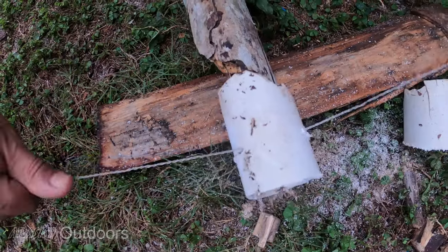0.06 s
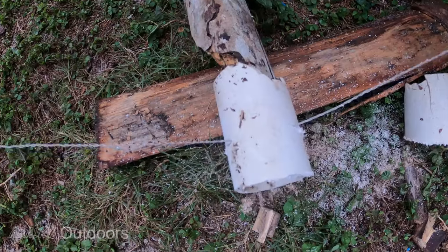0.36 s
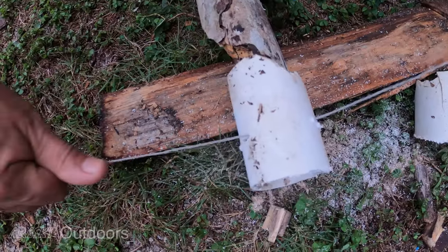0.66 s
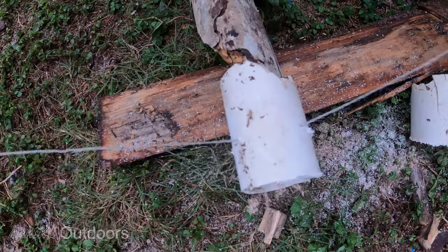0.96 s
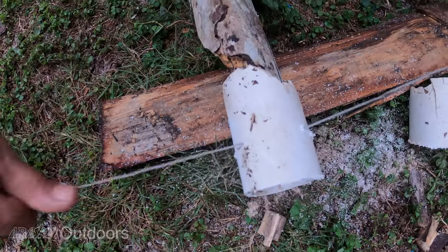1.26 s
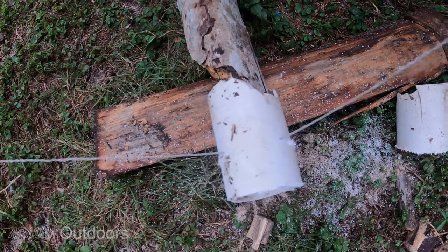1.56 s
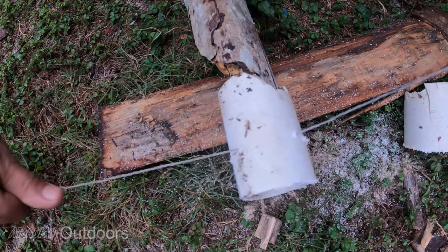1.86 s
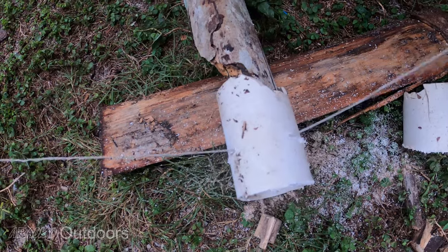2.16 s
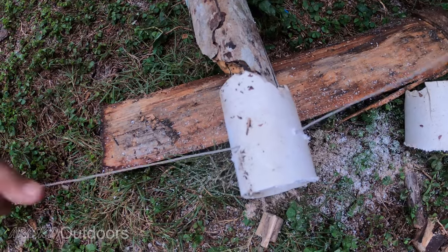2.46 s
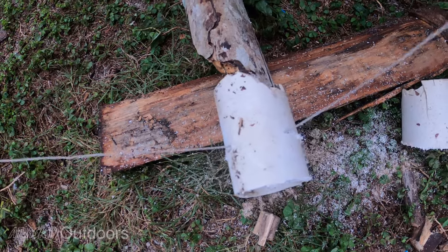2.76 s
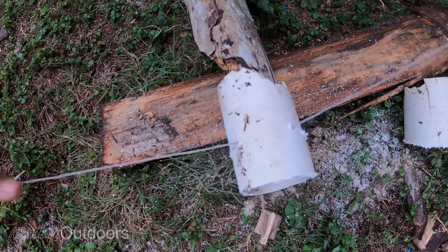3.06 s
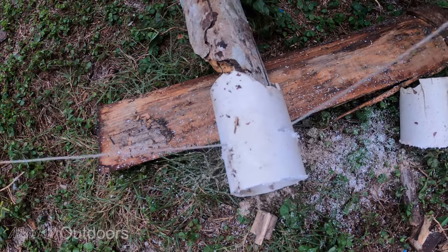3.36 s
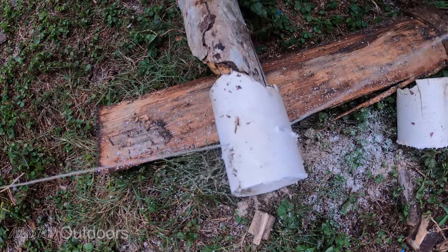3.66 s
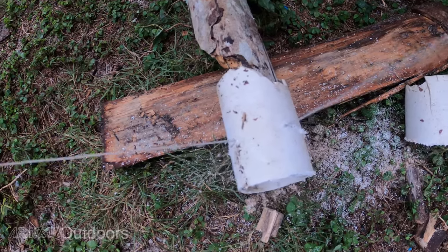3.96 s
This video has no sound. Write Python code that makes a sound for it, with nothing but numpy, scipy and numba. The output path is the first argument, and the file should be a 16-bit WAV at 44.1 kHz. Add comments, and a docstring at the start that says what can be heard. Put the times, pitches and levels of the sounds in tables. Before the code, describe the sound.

A wire saw rasps back and forth through a log in quick, even strokes.

```python
"""Wire saw through a sleeved log

A wire saw is pulled to and fro through a log sleeved in plastic pipe, outdoors and close up.
The twisted wire tears fibres in dense, chattering clicks that ring log and pipe; now and then it snags.
Its twists zip over the edge of the cut, and it thrums higher as it tightens and squeaks when slack.
The log rumbles and knocks on its plank. Under it all lies a low bed of air with one deep swell."""
import sys
import numpy as np
from scipy import signal
from scipy.fft import rfft, irfft
from scipy.io import wavfile
from numba import njit

SR = 44100
rng = np.random.default_rng(int(sys.argv[2]) if len(sys.argv) > 2 else 0)


def put_to_file(sound):
    """Save the sound as 16-bit audio at rate SR, in the file named by the first command-line argument."""
    columns = np.atleast_2d(sound).T  # one column per channel
    safe = np.clip(columns, -1, 1)
    whole_steps = np.round(safe * 32767)
    wavfile.write(sys.argv[1], SR, whole_steps.astype(np.int16))


N = 176400
TAPS = 4096  # length of the ring of log and pipe, in samples

# pulls of the saw, left and right in turn, each with its own trims (start [s], speeding up [s],
# slowing down [s], rasp [dB], treble [dB], pipe ring [dB], zip [dB], wire hum [dB])
STROKES = [(-.08, 0.13, .11, 1, 2.1, 1.5, -4, 4.5), (.283, 0.15, 0.19, 1.85, 2, 0, -1, -2),
           (0.599, .14, 0.089, .4, 2, 1, -5, -3.5), (0.918, 0.1, .13, 0.56, 0, 1, 6, 0),
           (1.23, 0.14, 0.11, 1.2, 1, 1.5, 2, -4), (1.53, 0.13, 0.12, 1.6, -0.5, 1, 3.5, 0.5),
           (1.83, 0.13, 0.12, 0.5, 1, -8, -5, -5), (2.13, 0.12, 0.15, 1.6, 0.5, -1, -3, 0),
           (2.438, 0.13, 0.11, -0.5, 1, -3, 2.5, 0), (2.764, 0.13, 0.14, 0.66, 1, -4, -0.5, 2),
           (3.069, 0.146, 0.11, 1.2, 0.5, -1.5, -0.5, 3.5), (3.373, 0.16, 0.15, 0.85, 1, -10, 0, 2),
           (3.696, 0.12, 0.1, 0, 1.9, 1, -2, 3.5)]
# the wire catches and breaks free (time [s], strength [dB])
SNAGS = [(0.327, -8.5), (0.438, -5), (1.028, -6), (1.072, 5), (1.3317, 0), (1.3907, -2), (1.509, -11),
         (1.631, -13), (1.678, 4), (1.878, -13), (2.206, -3), (2.524, -6), (2.72, -4), (3.15, -7),
         (3.2, -1), (3.314, 1.5), (3.347, -12), (3.454, 1), (3.967, -14)]
# broad tone colour of the cut (frequency [Hz], level [dB])
WOOD_COLOUR = [(60, -23.5), (200, -19.5), (400, -8.5), (520, -11), (820, -12.5), (1050, -5), (1330, -3.5),
               (1480, -9), (1700, -1), (2200, -1), (2800, -7), (4000, -4.5), (4400, -8), (4750, -1.5),
               (5200, 0.5), (5800, -10.5), (6400, -18), (8200, -17), (10200, -21.5), (11100, -27),
               (12300, -25), (13000, -31), (14000, -32), (15500, -69)]
# resonances of log and pipe
# (frequency [Hz], width [Hz], level pulling left [dB], pulling right [dB], change with time [dB/s])
BODY_MODES = [(410, 60, -14.5, -12, 3.5), (658, 84, 2, 0.5, 1.15), (717, 39, 4, -5.5, 1),
              (926, 82, 0.5, 0, -0.5), (1055, 67, 6.5, 2.5, 0), (1187, 96, 4.5, 2.5, -1),
              (1386, 136, 2, 3.5, -3.5), (1623, 140, -8, -8.5, 3.5), (1925, 116, 10, 7, 0),
              (2454, 76, -30, 5.5, -4), (3380, 130, 3, -23, -11.5), (6860, 460, -10.5, -29, -1.5),
              (10100, 1600, -23, -26, 2.5)]
# a thin overtone of the pipe, rising as the cut deepens (time [s], frequency [Hz])
PIPE_OVERTONE = [(0, 6440), (.8, 6660), (1.1, 7360), (1.7, 7550), (2.4, 8050), (2.9, 9610), (4, 10500)]
# squeaks of the slack wire (time [s], pitch [Hz], level [dB])
SQUEAKS = [(.487, 5160, -24), (.97, 4570, -43), (1.825, 4200, -45), (2.425, 4230, -45)]
# the log rocks on the plank (time [s], pitch [Hz], level [dB])
KNOCKS = [(0.134, 157, -28), (0.424, 154, -22), (1.149, 297, -21.5), (2.658, 410, -25), (2.70, 355, -22),
          (3.316, 332, -22.5), (3.949, 370, -25)]
# fader curve of the log's rumble (time [s], level [dB])
LOG_LEVEL = [(0, -34), (.6, -37), (1.1, -37), (1.75, -32), (2, -40.5), (2.4, -31), (2.85, -35.5),
             (3.1, -26), (3.4, -35.5), (4, -42.5)]
# tone colour of the outdoor air (frequency [Hz], level [dB])
AIR_COLOUR = [(20, -11), (35, -1), (55, -5.5), (80, -2.5), (150, -3), (300, -9.5), (600, -20), (2000, -22),
              (6000, -31), (15000, -78.5)]
# sound scattered by the ground (frequency [Hz], level against the direct sound [dB])
GROUND_SCATTER = [(100, -24), (1000, -9.5), (2000, -13), (3300, -1), (4300, -1), (5000, -7), (6000, -12.5),
                  (6800, -10), (9800, -5), (14000, -10)]
# stereo balance (frequency [Hz], left minus right [dB])
STEREO_BALANCE = [(100, 1.9), (600, 1), (1200, -1), (2000, 0.2), (4000, 1), (5500, 3), (6500, -1),
                  (8300, -6), (9300, -7.5), (10200, -23), (11000, -9), (14000, -6)]
# stereo phase (frequency [Hz], lead of the left side [rad])
STEREO_PHASE = [(20, 0), (500, 0.35), (1000, 0.13), (2000, -0.95), (4000, -0.5), (5100, -2), (5800, -5.5),
                (6300, -2 * np.pi)]


def saw(t, speed, since_turn, stroke, chatter, rings):
    """One layer of sawing: the rasp through log and pipe, the wire's zip and hum, the log's rumble."""
    pressure, bite, pipe_gain, zip_gain, hum_gain = undb(np.array(STROKES).T[3:])[:, stroke]
    stuck_db = -4.5 * (since_turn < .016)  # the wire sticks for a moment after each turn
    force = undb(-19 + stuck_db) * pressure * (.05 + speed ** 1.85) * chatter
    rasp = log_and_pipe(t, tearing(speed, force, bite) + snags(t), stroke, rings, pipe_gain)
    wire = zip_gain * wire_zip(speed, chatter) + hum_gain * wire_hum(speed)
    return rasp + wire + log_rumble(t, speed)


def arm_motion(t, last_turn_s=4.01):
    """Each pull speeds up and slows to the turn: gives speed (0 to 1), time since the turn, stroke."""
    start, rise, fall = np.array(STROKES).T[:3]
    end = np.append(start[1:], last_turn_s)
    stroke = np.maximum(np.searchsorted(start, t, side="right") - 1, 0)
    since_turn = t - start[stroke]
    ease = lambda u: np.sin(np.pi / 2 * np.clip(u, 0, 1))
    speed = ease(since_turn / rise[stroke]) * ease((end[stroke] - t) / fall[stroke])
    return speed, since_turn, stroke


def tearing(speed, force, bite, treble_hz=2780):
    """Clicks of torn fibres, denser and brighter with speed."""
    chance = np.clip(7500 * (speed + .15) / SR, 0, 1)
    size = undb(3 * np.minimum(noise(), 2)) * np.sign(noise())
    clicks = unit((rng.random(N) < chance) * size / np.sqrt(chance)) * force
    hz = np.arange(N // 2 + 1) * SR / N
    dull = irfft(rfft(clicks) / (1 + (hz / treble_hz) ** 4), N)
    return dull + (clicks - dull) * bite * (.68 + .32 * speed ** .42)


def snags(t, decay_s=.0018):
    """The wire catches and breaks free in sharp bursts of noise."""
    bursts = sum(undb(db - 9.5) * (t >= s) * np.exp(-np.abs(t - s) / decay_s) for s, db in SNAGS)
    return bursts * noise()


def body_rings(ripple_hz=130.2, ripple_db=1.97):
    """One impulse response a stroke: the ring follows the direction of pull and the depth of the cut."""
    f, rings = np.arange(TAPS // 2 + 1) * SR / TAPS, []
    for k, (start, *_) in enumerate(STROKES):
        power = undb(curve(WOOD_COLOUR, TAPS)) ** 2
        for hz, width, left, right, growth in BODY_MODES:
            peak = undb((left, right)[k % 2] + growth * start)
            power += peak ** 2 / (1 + (2 * (f - hz) / width) ** 2) ** 1.54
        # the wire's fine resonances, new with each stroke and weaker in the bass
        ripple = np.interp(f / ripple_hz, np.arange(len(f)), noise(len(f))) * np.minimum(f / 3000, 1)
        rings.append(impulse_response(unit(np.sqrt(power) * undb(ripple_db * ripple))))
    return rings


def log_and_pipe(t, drive, stroke, rings, pipe_gain):
    """The tearing rings through log and pipe; the pipe sings more in some strokes."""
    body = np.zeros(N + TAPS)
    for k in np.unique(stroke):
        span = np.flatnonzero(stroke == k)
        body[span[0]:span[-1] + TAPS] += signal.fftconvolve(drive[span], rings[k])
    body = body[:N]
    pipe = bandpass(body, hz=1934, width_hz=78)
    overtone = bandpass(body, np.interp(t, *np.array(PIPE_OVERTONE).T), width_hz=340)
    return body + (pipe_gain - 1) * pipe + .23 * overtone


def wire_zip(speed, chatter, slow_hz=242, fast_hz=1176, width_hz=346):
    """The twists bump over the edge of the cut: a rough tone that rises and falls with speed."""
    hz = (slow_hz + (fast_hz - slow_hz) * speed ** 2) * undb(.5 * wander(40))
    tone = bandpass(bandpass(noise(), hz, width_hz), hz, 2 * width_hz)
    return undb(-32) * unit(tone) * chatter * speed


def wire_hum(speed, slack_hz=206, taut_hz=240.7):
    """The wire thrums, higher and louder as the pull tightens it."""
    hz = slack_hz + (taut_hz - slack_hz) * speed ** 2
    return undb(-34.5) * unit(bandpass(noise() * (speed + .083), hz, width_hz=21))


def wire_squeaks(t):
    """Brief, narrow whistles of the slack wire in the cut."""
    return sum(undb(db) * swell(t, s, hz, width_hz=190, spread_s=.032) for s, hz, db in SQUEAKS)


def fibre_snap(t):
    """One fibre breaks with a bright tick."""
    return undb(-13.5) * ping(t, at_s=.436, hz=12000, decay_s=.0009)


def log_knocks(t):
    """Dull, short knocks as the log rocks on its plank."""
    return sum(undb(db) * ping(t, s, hz, decay_s=.014) for s, hz, db in KNOCKS)


def log_rumble(t, speed, hz=101.5, width_hz=23.3):
    """The log rumbles on the plank, pulsing a little with each pull."""
    shake = noise() * (speed + 2.6)
    rumble = bandpass(bandpass(shake, hz, width_hz), hz, 2 * width_hz)
    return undb(np.interp(t, *np.array(LOG_LEVEL).T)) * unit(rumble)


def deep_swell(t):
    """A sub-bass rumble comes and goes once."""
    return undb(-39) * swell(t, at_s=1.55, hz=34.7, width_hz=6, spread_s=.4)


def outdoor_air():
    """A steady bed of dark noise."""
    return undb(-35.5) * unit(irfft(rfft(noise()) * undb(curve(AIR_COLOUR)), N))


def stereo_image(direct, scattered, accents):
    """Ground scatter widens the bed; then bed and accents lean left or right, band by band."""
    scatter, sides = undb(curve(GROUND_SCATTER)), np.array([[1], [-1]])
    bed = (rfft(direct) + sides * scatter * rfft(scattered)) / np.sqrt(1 + scatter ** 2)
    balance = undb(sides * curve(STEREO_BALANCE) / 2)
    balance /= np.sqrt(np.mean(balance ** 2, axis=0))
    phase = np.exp(1j * curve(STEREO_PHASE) * np.array([[1], [0]]))
    return irfft((bed + rfft(accents)) * phase * balance, N)


def ping(t, at_s, hz, decay_s):
    """A struck sine that dies away."""
    age = np.maximum(t - at_s, 0)
    return np.sin(2 * np.pi * hz * age) * np.exp(-age / decay_s)


def swell(t, at_s, hz, width_hz, spread_s):
    """Narrow noise that fades in and out on a bell curve."""
    return np.exp(-((t - at_s) / spread_s) ** 2) * unit(bandpass(noise(), hz, width_hz))


@njit
def bandpass(x, hz, width_hz):
    """A resonant band-pass whose centre may hold or glide."""
    centre = hz * np.ones(len(x))
    y, band, low = np.empty(len(x)), 0., 0.
    for i in range(len(x)):
        g, damping = np.tan(np.pi * centre[i] / SR), width_hz / centre[i]
        v = (band + g * (x[i] - low)) / (1 + g * (g + damping))
        band, low, y[i] = 2 * v - band, low + 2 * g * v, damping * v
    return y


def impulse_response(gain):
    """The minimum-phase ring with this gain in every bin."""
    cepstrum = irfft(np.log(gain))
    cepstrum[1:TAPS // 2] *= 2
    cepstrum[TAPS // 2 + 1:] = 0
    return irfft(np.exp(rfft(cepstrum)))


def curve(points, size=N):
    """Draw a table of (frequency [Hz], value) across the bins of a spectrum."""
    hz, value = np.array(points, float).T
    return np.interp(np.log(np.arange(size // 2 + 1) * SR / size + 1), np.log(hz), value)


def wander(hz):
    """Random modulation with an rms of 1, gliding to a new value hz times a second."""
    return unit(np.interp(np.arange(N) * hz / SR, np.arange(N), noise()))


def noise(size=N):
    """White noise."""
    return rng.standard_normal(size)


def undb(db):
    """Decibels to gain."""
    return 10 ** (np.asarray(db) / 20)


def unit(x):
    """Scale to an rms of 1."""
    return x / np.sqrt(np.mean(x ** 2))


def scene():
    """Saw and air arrive directly and scattered by the ground, with single accents on top."""
    t = np.arange(N) / SR
    speed, since_turn, stroke = arm_motion(t)
    chatter = unit(undb(1.5 * wander(hz=425.4) + wander(hz=109.4)))  # fast judder, slower shifts of grip
    rings = body_rings()
    direct, scattered = (saw(t, speed, since_turn, stroke, chatter, rings) + outdoor_air()
                         for _ in range(2))
    accents = fibre_snap(t) + log_knocks(t) + wire_squeaks(t) + deep_swell(t)
    return stereo_image(direct, scattered, accents)


def record(dry, top_hz=15600):
    """A steep low-pass trims the very top."""
    return signal.sosfilt(signal.ellip(8, .2, 70, top_hz, fs=SR, output="sos"), dry)


dry = scene()
out = record(dry)
put_to_file(out)
```